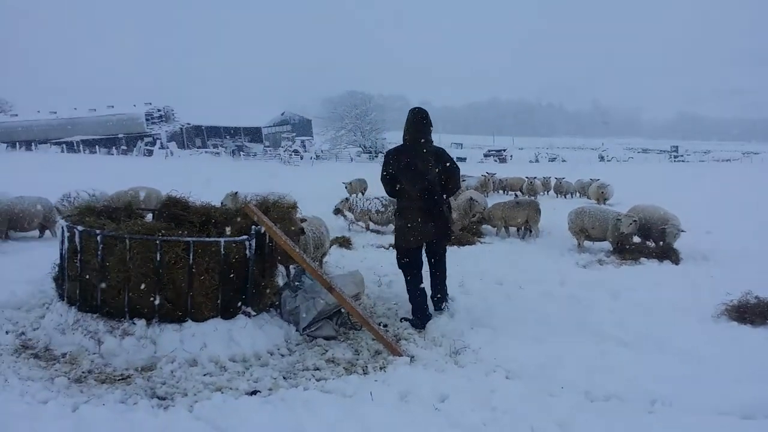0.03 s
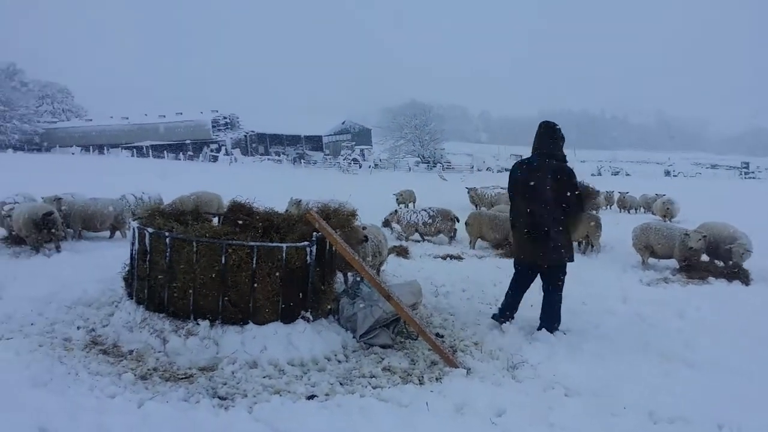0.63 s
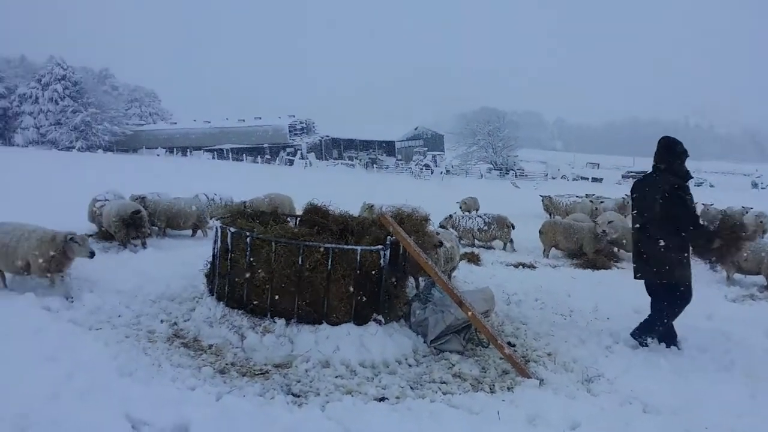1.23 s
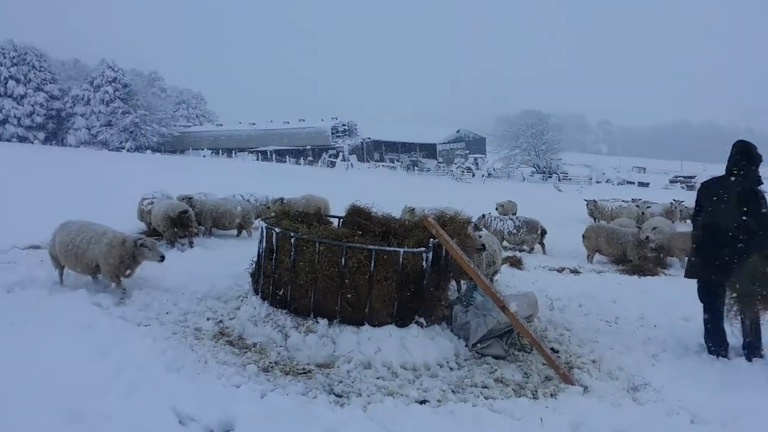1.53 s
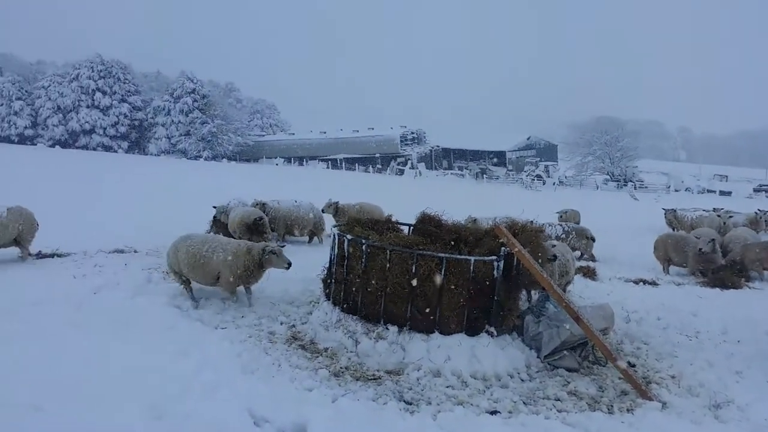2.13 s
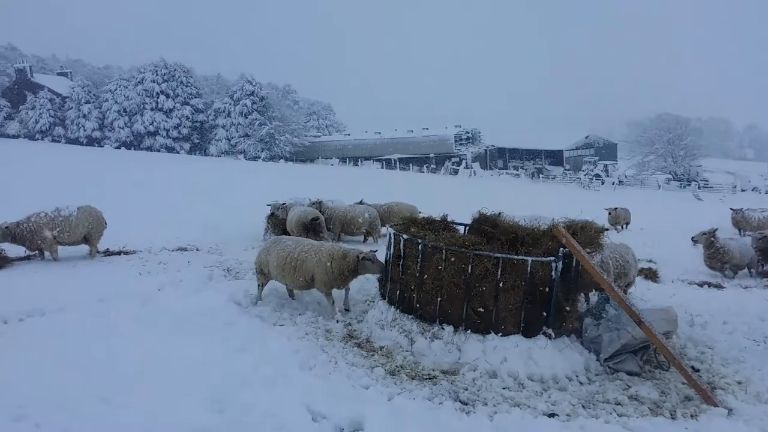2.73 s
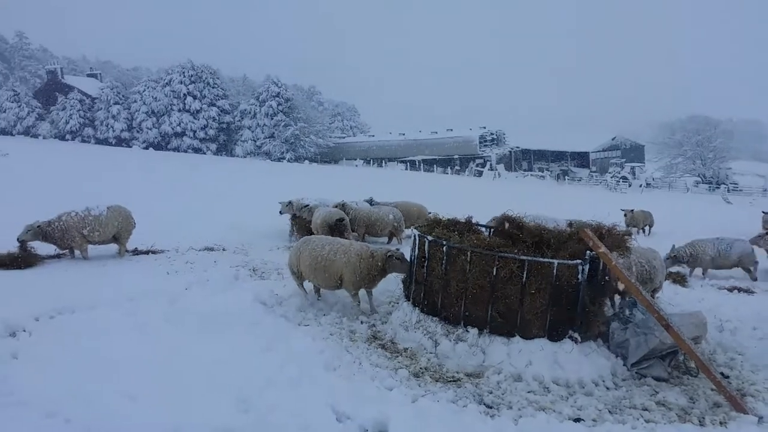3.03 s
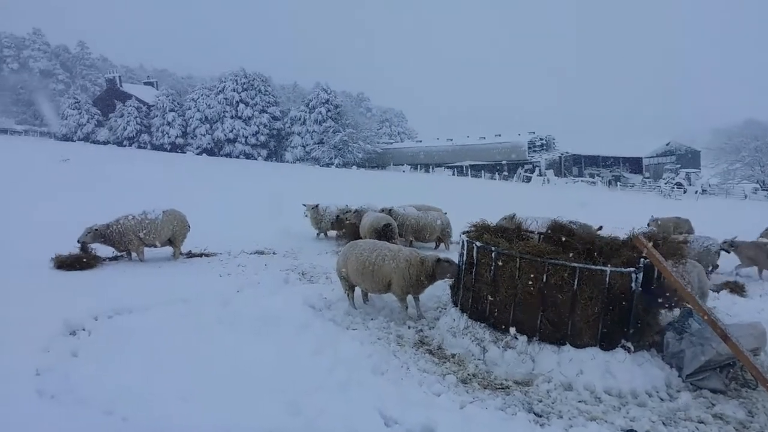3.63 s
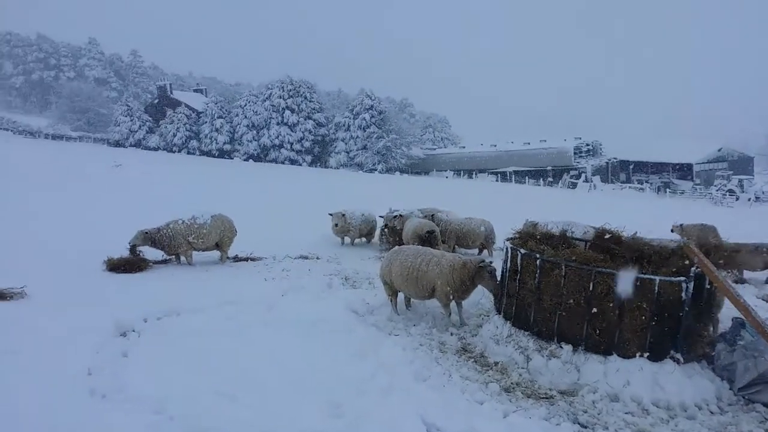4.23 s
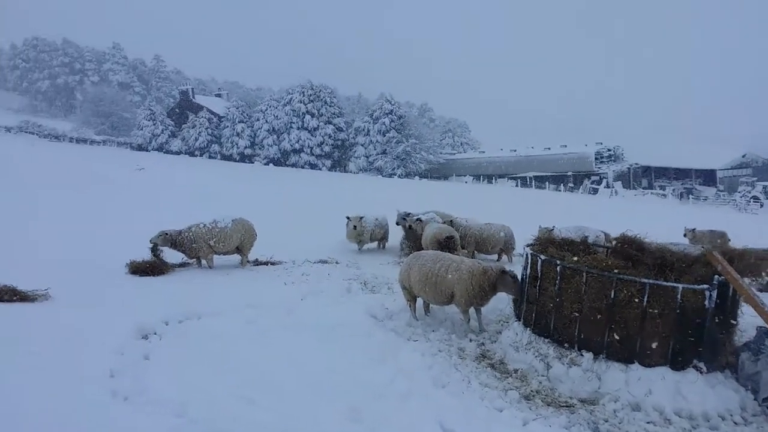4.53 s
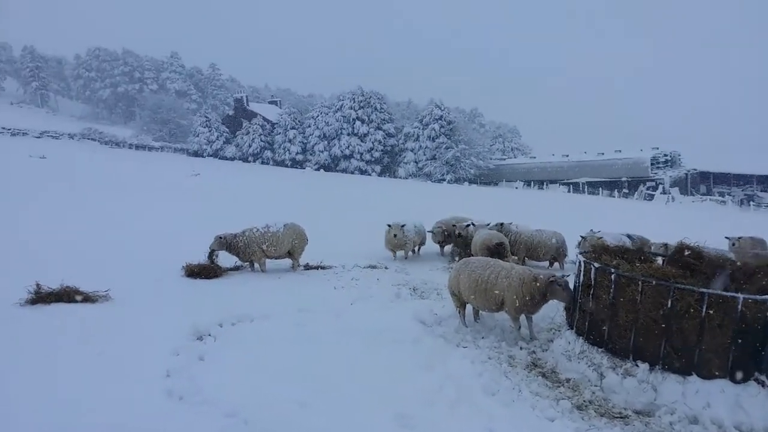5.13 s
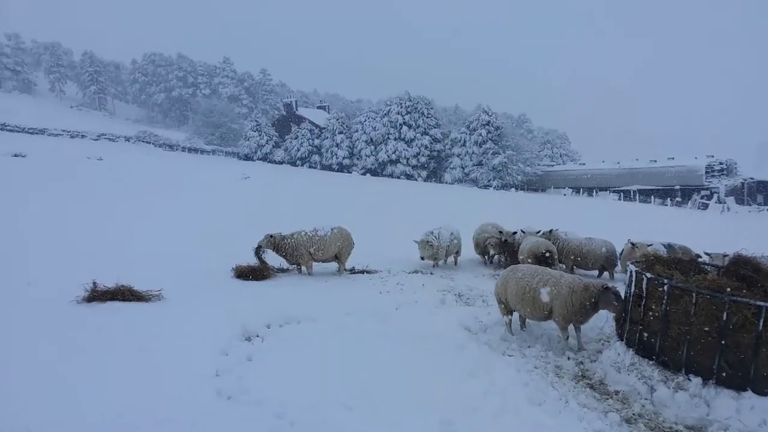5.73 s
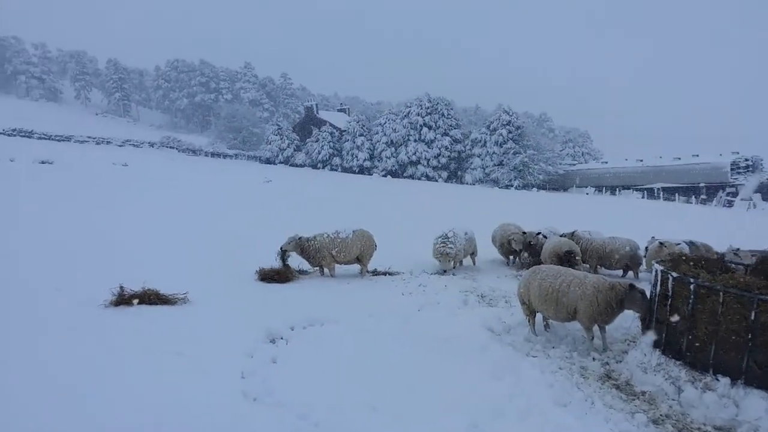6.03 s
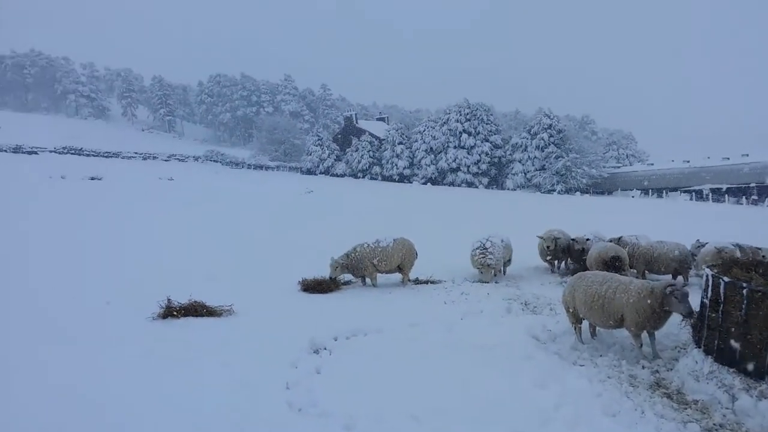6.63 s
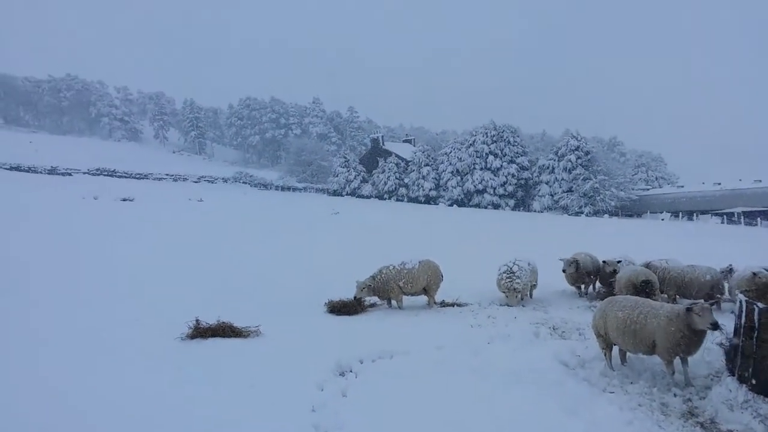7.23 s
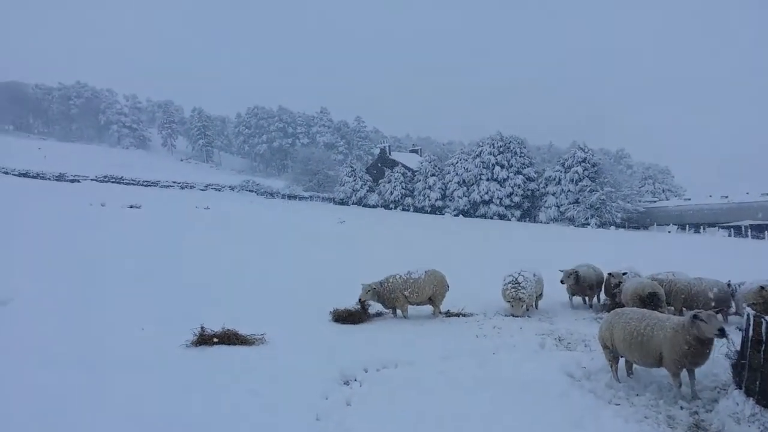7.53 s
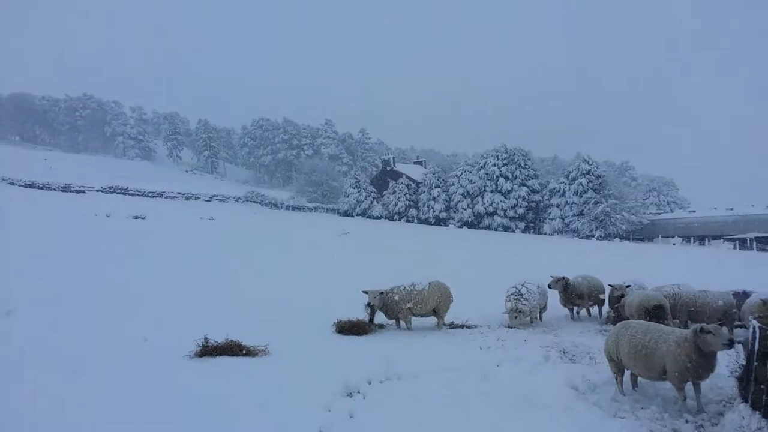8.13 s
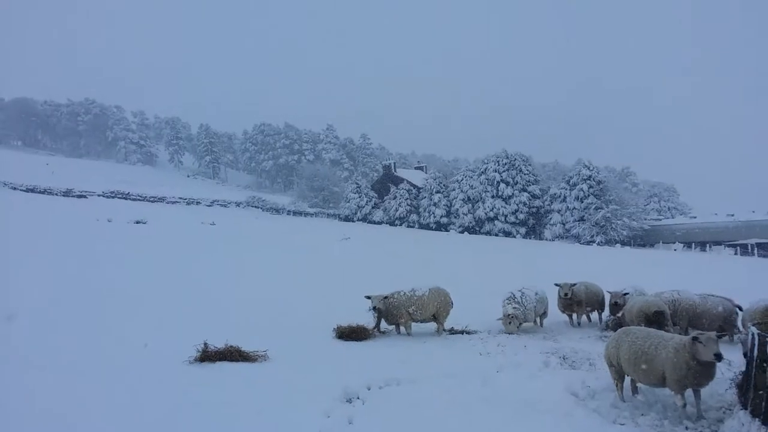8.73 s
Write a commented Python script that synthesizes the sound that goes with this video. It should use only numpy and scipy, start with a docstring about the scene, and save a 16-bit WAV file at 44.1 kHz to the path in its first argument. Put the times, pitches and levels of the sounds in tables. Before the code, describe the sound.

Uneven low wind rumble and thumps on the microphone, over a soft hiss of blowing snow and light flake ticks.

```python
"""Gusty wind buffets the two microphone ports of a hand-held camera in a snowy field.
From the start, eddies rumble on each port separately, louder and brighter in stronger gusts, over far
wind, snow hiss, a faint whistle, fine patter and one faint chirp. Within the first second, tight
vortices begin to slap the ports, soft rustles come in and icy flakes tick on the camera body.
The sound is quieter around 5 s, then the gusts return; from about 6 s the blowing snow grows louder."""
import sys
import numpy as np
from scipy import signal
from scipy.fft import rfft, irfft, next_fast_len
from scipy.io import wavfile
from scipy.ndimage import uniform_filter1d, minimum_filter1d, map_coordinates

SR = 44100
rng = np.random.default_rng(int(sys.argv[2]) if len(sys.argv) > 2 else 0)


def materialize(psi):
    """Save the field psi as 16-bit PCM at rate SR to the path in sys.argv[1].

    A 1-D psi becomes a single channel; in a 2-D psi each row is a channel.
    """
    bounded = np.clip(np.atleast_2d(psi).T, -1, 1)
    quanta = np.round(bounded * 32767).astype(np.int16)
    wavfile.write(sys.argv[1], SR, quanta)


N = 391166
TIME = np.arange(N) / SR
# Loudness of the background hiss, which ducks briefly near 1.1 s and 5.2 s.
# Each row: time in seconds, relative level in dB.
HISS_LEVEL = [(0, -60), (0.8, -57.5), (1.14, -60), (1.9, -59.5), (2.35, -57), (2.65, -60), (2.95, -58),
              (3.38, -59.5), (3.55, -57.5), (3.75, -61), (4.0, -58.5), (4.2, -61.5), (5.08, -60),
              (5.22, -65), (5.45, -61), (6.3, -58), (6.6, -56), (7.28, -53), (7.47, -56), (7.8, -51.5),
              (8.02, -51.5), (8.22, -45), (8.41, -51.5), (8.87, -48.5)]


def undb(db):
    """Decibels to gain."""
    return 10 ** (np.asarray(db) / 20)


def curve(rows):
    """Join (seconds, value) rows with straight lines."""
    return np.interp(TIME, *np.transpose(rows))


def unit(x):
    """Scale to rms 1."""
    return x / np.sqrt(np.mean(x ** 2))


def pan(db):
    """Stereo gains for a left-minus-right level."""
    return undb(np.array([[db], [-db]]) / 2)


def colour(x, points):
    """Filter by a spectrum of (Hz, dB) points; rms 1."""
    hz, db = np.transpose(points)
    size = next_fast_len(x.shape[-1])
    bins_hz = np.maximum(np.fft.rfftfreq(size, 1 / SR), 1)
    gain = undb(np.interp(np.log(bins_hz), np.log(hz), db))
    return unit(irfft(rfft(x, size) * gain, size)[..., :x.shape[-1]])


def resonate(x, hz, width_hz):
    """One resonance, gain 1 at its centre."""
    return signal.lfilter(*signal.iirpeak(min(hz, SR / 2 - 1000), hz / width_hz, fs=SR), x)


def walk(rate_hz):
    """Smooth random motion, rms 1."""
    k = max(int(SR / rate_hz), 2)
    steps = np.repeat(rng.standard_normal(N // k + 1), k)
    return unit(uniform_filter1d(uniform_filter1d(steps, k), k)[:N])


def add(out, start_s, sound):
    """Mix in a short stereo sound."""
    i = max(int(start_s * SR), 0)
    out[:, i:i + sound.shape[1]] += sound[:, :N - i]


def port_band(x, low_hz=72, high_hz=1750):
    """A port passes little of the slowest pressure swings and the finest eddies."""
    x = signal.sosfilt(signal.butter(6, high_hz, fs=SR, output="sos"), x)
    return signal.sosfilt(signal.butter(2, low_hz, "high", fs=SR, output="sos"), x)


def airflow(side, wind_octaves=-.2, surge_hz=26, attack_s=.028, release_s=.04444, sag_db_per_s=2):
    """Wind plus buffets on one port (side > 0: left). Returns level in dB, pitch shift in octaves."""
    # Wind between buffets. Each row: time in seconds, level in dB.
    wind = [(0, -34), (0.85, -25), (1.23, -35), (1.75, -25.5), (2.43, -21.5), (2.62, -41.5), (2.75, -29),
            (3.2, -35), (3.93, -27), (4.17, -38.5), (4.54, -33), (4.82, -53), (5.05, -30), (5.22, -57),
            (5.32, -37), (5.88, -44), (6.26, -42), (6.31, -26), (7.05, -25), (7.12, -53.5), (7.47, -50),
            (7.62, -31.5), (8.87, -22.5)]
    # Shelter of the left port as the camera turns. Each row: time in seconds, left minus right in dB.
    lee = [(0, 4), (1.0, -5), (4.1, -5), (4.6, 2), (5.5, -5), (7.4, -1), (7.7, -12), (8.87, -9.5)]
    # Each row: start in seconds, length in seconds, level in dB, left minus right in dB,
    # pitch shift in octaves.
    buffets = [(0.104, 0.07, -20, -13.5, -0.52), (0.512, 0.13, -22, -8, -0.22),
               (0.718, 0.18, -15, -12, 0.023), (0.91, 0.41, -11.5, -30, -0.0081),
               (1.016, 0.071, -12, 16, -0.31), (1.332, 0.14, -18.5, -11, -0.12),
               (1.522, 0.043, -14, -15, -0.088), (1.619, 0.075, -16, -15, 0.019),
               (1.75, 0.14, -16, 7, -0.086), (1.966, 0.082, -15.5, -21.5, 0.12),
               (2.229, 0.18, -18.5, -2, 0.13), (2.461, 0.11, -20, -20.5, -0.3),
               (2.729, 0.18, -20, -4, -0.46), (2.939, 0.076, -16, -16.5, -0.44),
               (3.122, 0.056, -20, -2, -0.97), (3.249, 0.057, -17.5, -29.5, -0.69),
               (3.409, 0.049, -17, -16.5, -0.85), (3.58, 0.23, -19.5, -2, -0.4),
               (3.822, 0.07, -16, -22, -0.23), (4.306, 0.053, -19, -15, -0.11),
               (4.409, 0.063, -25, -21.5, -0.54), (4.879, 0.13, -27.5, 22, -0.33),
               (5.608, 0.17, -25, -22.5, -0.69), (5.949, 0.1, -26, -20, -0.38),
               (6.158, 0.0548, -25, -20, -0.34), (6.589, 0.32, -17, -5, -0.58),
               (6.977, 0.083, -18.5, 14.5, -0.54), (7.476, 0.093, -27.5, 23, -0.37),
               (7.636, 0.084, -23, -27.5, -0.28), (7.979, 0.2, -20.5, -20, -0.12),
               (8.13, 0.15, -22.5, 1, -0.21), (8.291, 0.16, -25, -5.5, -0.096),
               (8.485, 0.1, -17, -30, 0.095), (8.608, 0.11, -15, -25.5, 0.21),
               (8.742, 0.057, -15, -20.5, 0.12), (8.836, 0.031, -10.5, -27, 0.25)]
    wind_surge_db = 2.5 * np.clip(walk(surge_hz), -2, 2)
    buffet_surge_db = 1.14 * np.clip(walk(surge_hz), -2, 2)
    power = undb(curve(wind) + curve(lee) * (side > 0) + wind_surge_db) ** 2
    weighted_octaves = wind_octaves * power
    for start_s, length_s, db, pan_db, octaves in buffets:
        span = slice(max(int(start_s * SR), 0), int((start_s + length_s + release_s) * SR))
        age_s = TIME[span] - start_s
        envelope = np.clip(age_s / attack_s, 0, 1) * np.clip((length_s - age_s) / release_s + .5, 0, 1)
        push_db = db + min(side * pan_db, 0) - sag_db_per_s * age_s + buffet_surge_db[span]
        push = (envelope * undb(push_db)) ** 2
        power[span] += push
        weighted_octaves[span] += octaves * push
    return 10 * np.log10(power), weighted_octaves / power


def rumble(gust_db, octaves, moderate_db, speed_exponent, swirl_db=2, settle_s=.052):
    """A frozen eddy pattern sweeps over one port; faster air is louder and higher."""
    # Eddy spectrum in a moderate gust. Each row: frequency in Hz, relative density in dB.
    eddies = [(20, -5), (50, -4.5), (100, -1.5), (160, -3), (250, -8.5), (400, -21), (600, -35),
              (850, -45.5), (1200, -67.5), (1800, -95)]
    # Quick swirls and slower puffs raise speed and pressure together.
    swirl = np.clip(walk(rate_hz=190), -2, 2)
    puff_db = 2.8 * np.clip(walk(rate_hz=80), -2, 2)
    gust_speed = undb(speed_exponent * (gust_db - moderate_db))
    speed = gust_speed * 2 ** (octaves + .02002 * puff_db) * np.exp(.18 * swirl)
    pattern = colour(rng.standard_normal(2 * N), eddies)
    pressure = map_coordinates(pattern, [np.cumsum(speed)], order=3, mode="wrap")
    pressure = port_band(pressure * undb(swirl_db * swirl + puff_db))
    # The gust sets the mean level; single eddies stay uneven.
    k = int(settle_s * SR)
    power = uniform_filter1d(uniform_filter1d(pressure ** 2, k), k)
    return pressure / np.sqrt(power + 1e-12) * undb(gust_db)


def far_wind(level_db=-55, flutter_db=2.5):
    """Wind over the field flutters, and ducks briefly with the hiss near 5.2 s."""
    # Each row: frequency in Hz, relative density in dB.
    spectrum = [(30, 4.5), (100, 8.5), (200, -0.5), (350, -2), (550, -8.5), (800, -6.5), (1200, -11.5),
                (1900, -14.5), (4000, -21), (12000, -24)]
    hiss_db = curve(HISS_LEVEL)
    swell_db = np.minimum(hiss_db - hiss_db[0], 1) + .6 * walk(4)
    air = colour(rng.standard_normal((2, N)), spectrum)
    return air * undb(level_db + swell_db + flutter_db * walk(45)) * pan(-4)


def snow_hiss(gain_db=-1.5, flicker_db=.7, lag_samples=12):
    """Blowing snow hisses all around and rings the ports, mainly the left."""
    # Each row: frequency in Hz, relative density in dB.
    spectrum = [(900, -37), (1800, -4.5), (3200, -1.5), (4300, -1), (5200, 0), (6800, 1.5), (8600, -3),
                (10500, -3), (12500, -5.5), (15500, -2)]
    near = rng.standard_normal(N)
    direct = np.array([np.roll(near, lag_samples), near])  # reaches the right port first
    air = rng.standard_normal((2, N)) + direct
    hiss = colour(air * undb(flicker_db * walk(220)), spectrum)
    port_ring = np.array([[1], [.1]]) * resonate(hiss, hz=6750, width_hz=1300)
    return unit(hiss + port_ring) * undb(curve(HISS_LEVEL) + gain_db) * pan(2)


def whistle(start_hz=7165, sag_hz_per_s=41.5, level_db=-75, flutter_db=3):
    """A faint tone high in the hiss wavers and slowly sinks."""
    waver_hz = 20 * walk(120)
    phase = 2 * np.pi * np.cumsum(start_hz - sag_hz_per_s * TIME + waver_hz) / SR
    return unit(np.sin(phase) * undb(flutter_db * walk(30))) * undb(level_db) * pan(5)


def chirp(start_hz=1870, fall_hz_per_s=11000, attack_s=.004, decay_s=.029, level_db=-52):
    """A faint, short tone falls as it fades."""
    out, t = np.zeros((2, N)), np.arange(SR // 12) / SR
    tone = np.sin(2 * np.pi * np.cumsum(start_hz - fall_hz_per_s * t) / SR)
    envelope = np.minimum(t / attack_s, 1) * np.exp(-t / decay_s)
    add(out, 0, tone * envelope * undb(level_db) * pan(0))
    return out


def patter(rate_per_s=75, level_db=-54.5, decay_s=.0037, low_hz=1300, high_hz=8000):
    """Small flakes crunch at random pitch, size and side; their level follows the hiss."""
    out, t = np.zeros((2, N)), np.arange(SR // 60) / SR
    hiss_db = curve(HISS_LEVEL)
    for when, size, pitch, side in rng.random((int(rate_per_s * N / SR), 4)):
        hz = low_hz * (high_hz / low_hz) ** pitch
        crunch = resonate(rng.standard_normal((2, len(t))) * np.exp(-t / decay_s), hz, .59 * hz)
        size_db = 3.2 * min(-np.log(size), 3.5)
        db = level_db + size_db + .8 * (hiss_db[int(when * N)] - hiss_db[0])
        add(out, when * N / SR, crunch * undb(db) * pan(10 * side - 5))
    return out


def slaps(gain_db=-3, thud_db=-9, wake_db=-14, wake_s=.0037, roll_db=-13, roll_s=.011, far_port_db=-33):
    """A tight vortex crosses a port: core push-pull, slower rim thud, fine wake, deeper roll."""
    # Each row: time in seconds, relative level in dB, core pitch in Hz, port ("left" or "right").
    vortices = [(0.139, -8, 188, "right"), (0.161, -10, 228, "right"), (0.526, -6.5, 240, "right"),
                (0.553, -10, 295, "right"), (0.613, -7.5, 183, "right"), (0.918, -3.5, 312, "right"),
                (0.932, -4.5, 378, "right"), (0.958, -5, 336, "right"), (0.965, -9.5, 895, "right"),
                (0.984, 2, 325, "right"), (0.998, 2, 230, "right"), (1.013, -3, 302, "right"),
                (1.026, -1, 202, "right"), (1.060, 2, 125.8, "left"), (1.064, -6.5, 404, "right"),
                (1.112, -3, 286, "right"), (1.129, -1, 395, "right"), (1.148, 0, 356, "right"),
                (1.175, -3, 292, "right"), (1.205, -2.5, 367, "right"), (1.244, -2, 214.3, "right"),
                (1.254, -13.5, 619, "right"), (1.302, -1.5, 303, "right"), (1.329, -7, 362, "right"),
                (1.355, -9.5, 256.6, "right"), (1.393, -5, 230.2, "right"), (1.451, -6, 268.7, "right"),
                (1.557, -9, 243, "right"), (1.656, -7, 253, "right"), (1.815, -14.5, 280, "right"),
                (1.852, -6.5, 272.6, "left"), (1.994, -4, 302, "right"), (2.022, -6.5, 419, "right"),
                (2.038, -6.5, 232, "right"), (2.085, -9.5, 329.4, "right"), (2.164, -8, 226, "right"),
                (2.198, -2.5, 215.2, "left"), (2.239, -5.5, 278.4, "left"), (2.257, -4.5, 230.3, "right"),
                (2.278, -7, 240, "right"), (2.302, -12.5, 319.8, "right"), (2.337, -4.5, 309.8, "right"),
                (2.368, -8, 248.1, "right"), (2.455, -8, 255.8, "left"), (2.490, -9, 261, "right"),
                (2.553, -6.5, 161.2, "right"), (2.778, -11, 216.2, "right"), (2.877, -9.5, 491, "left"),
                (2.980, -12.5, 170, "right"), (3.436, -11, 114.8, "right"), (3.624, -9.5, 191, "right"),
                (3.756, -6.5, 190.5, "right"), (3.766, -5, 242, "right"), (3.846, -7.5, 260.4, "right"),
                (3.859, -2.5, 248.3, "right"), (3.875, -6.5, 346.5, "right"), (3.918, -7, 187.6, "right"),
                (4.337, -11.5, 299, "right"), (4.450, -16.5, 186, "right"), (4.968, -18.5, 200, "left"),
                (5.323, -20, 200, "left"), (5.644, -8.5, 134.3, "right"), (5.726, -16, 160, "right"),
                (6.359, -14, 210, "right"), (6.638, -6, 130, "left"), (6.749, -9, 245.3, "left"),
                (6.79, 0, 142.4, "left"), (6.834, -8, 207.2, "right"), (6.896, -11.5, 240.7, "right"),
                (7.019, -10, 199.2, "left"), (7.046, -11, 181.7, "left"), (8.005, -12.5, 204.3, "right"),
                (8.056, -20.5, 290, "right"), (8.144, -14, 309.4, "left"), (8.242, -7.5, 274.6, "left"),
                (8.300, -15, 199.8, "right"), (8.347, -21.5, 359, "left"), (8.413, -16.5, 290.7, "left"),
                (8.494, -10.5, 260.4, "right"), (8.505, -3.5, 316, "right"), (8.526, -6, 490, "right"),
                (8.513, -9.5, 421, "right"), (8.544, -7, 338.3, "right"), (8.576, -7.5, 339, "right"),
                (8.629, -5, 592.3, "right"), (8.648, -6, 199.9, "right"), (8.670, -11.5, 381.1, "right"),
                (8.684, -13, 420, "right"), (8.697, -9.5, 310.2, "right"), (8.718, -7.5, 139.6, "right"),
                (8.761, -8, 490, "right"), (8.768, -8.5, 470.8, "right"), (8.819, -13, 255.9, "right"),
                (8.848, -11, 250.5, "right"), (8.862, -3.5, 320, "right")]
    out, t = np.zeros((2, N)), np.arange(-SR // 100, SR // 20) / SR
    wake_age = np.maximum(t / wake_s + .5, 0)  # starts just ahead of the core
    wake_envelope = (wake_age * np.exp(1 - wake_age)) ** 1.8
    roll_envelope = np.exp(-(t / roll_s - .5) ** 2) * np.clip(1 - t / t[0], 0, 1)
    push_pull = lambda phase: -phase * np.exp((1 - phase ** 2) / 2)
    for time_s, db, hz, port in vortices:
        port_gains = undb([[0], [far_port_db]] if port == "left" else [[far_port_db], [0]])
        phase = 2 * np.pi * hz * t
        swing = push_pull(phase) + undb(thud_db) * push_pull(.48 * phase)
        swing = np.real(signal.hilbert(swing) * np.exp(2j * np.pi * rng.random()))  # any crossing angle
        low_noise = resonate(resonate(rng.standard_normal(len(t)), hz / 2, hz / 2), hz / 2, hz / 2)
        roll = unit(low_noise) * roll_envelope
        wake_band = signal.butter(4, [hz / 2, hz * 1.88], "band", fs=SR, output="sos")
        wake = unit(signal.sosfilt(wake_band, rng.standard_normal(len(t)))) * wake_envelope
        slap = port_band(swing + undb(wake_db) * wake + undb(roll_db) * roll)
        add(out, time_s + t[0], slap * undb(db + gain_db) * port_gains)
    return out


def rustles(grain_db=4, grain_hz=450):
    """Short, gritty swells of friction, as of a coat or packed snow."""
    # Each row: peak time in seconds, level in dB, 1/e half-length in seconds, centre in Hz, width in Hz.
    scuffs = [(0.33, -55, 0.015, 990, 800), (2.107, -57, 0.052, 5570, 5500),
              (2.27, -58.5, 0.066, 4174, 5000), (2.467, -64, 0.04, 2980, 3000),
              (5.116, -53, 0.0059, 849.3, 190), (5.456, -62, 0.038, 1088, 397.6),
              (5.94, -59, 0.062, 850.2, 699.7), (5.953, -58, 0.061, 4400, 3202),
              (6.587, -50.5, 0.0094, 1143, 249.7), (8.438, -38, 0.0052, 700.7, 700.4),
              (8.457, -46, 0.015, 1098, 800)]
    out = np.zeros((2, N))
    grain = undb(grain_db * np.clip(walk(grain_hz), -2, 2))
    for peak_s, db, half_s, hz, width_hz in scuffs:
        rub = resonate(resonate(rng.standard_normal((2, N)) * grain, hz, width_hz), hz, 2 * width_hz)
        out += unit(rub) * undb(db) * np.exp(-((TIME - peak_s) / half_s) ** 2)
    return out


def flake_ticks(gain_db=.5, crush_s=.0011, splash_db=-21):
    """Each large icy flake shatters on the camera body and rings the spot it hits."""
    # Each row: start in seconds, relative peak level in dB, ring in Hz, left minus right in dB.
    flakes = [(0.582, -45, 6500, -4), (0.795, -45, 7500, 0), (0.807, -44, 6987, 6), (0.909, -39.5, 4920, 5),
              (1.737, -32, 6300, 6), (2.361, -47, 6000, 0), (2.373, -36.5, 6685, 4), (2.428, -46, 4800, 0),
              (2.535, -43, 6990, 0), (2.675, -47, 5794, 4), (2.832, -39.5, 6196, 4), (2.845, -40, 2588, -2),
              (3.056, -38, 6206, 3), (3.544, -43, 6008, 0), (4.619, -49, 12230, -5),
              (4.8179, -32.5, 6243, 15), (4.856, -50, 8996, 0), (4.880, -43, 3314, -3),
              (4.9094, -43, 7160, -11), (5.0271, -40, 5710, 10), (5.199, -44, 3988, -4),
              (5.236, -51, 2970, 3), (5.303, -44, 7020, 3), (5.365, -51, 9530, 0), (5.583, -48, 5003, -5),
              (5.674, -41, 3010, 2), (5.725, -41.5, 3183, -11), (6.0647, -38.5, 5613, 5),
              (6.35, -40.5, 4002, -5), (6.542, -44, 6001, -4), (7.473, -43, 9005, 0), (7.645, -37, 2900, 3),
              (7.698, -41, 6030, 0), (7.735, -39, 6626, 6), (7.877, -38.5, 3503, -7), (8.033, -38, 2703, 2),
              (8.436, -34, 3114, -11), (8.515, -39, 5487, 0), (8.584, -35, 6800, 9)]
    out, t = np.zeros((2, N)), np.arange(SR // 30) / SR
    for start_s, db, hz, pan_db in flakes:
        crush = rng.standard_normal((2, len(t))) * t * np.exp(-(t / crush_s) ** 1.5)
        tick = resonate(crush, hz, width_hz=750) + undb(splash_db) * crush
        tick = signal.sosfilt(signal.butter(4, hz * .61, "high", fs=SR, output="sos"), tick)
        tick /= np.abs(tick).max(axis=1, keepdims=True)
        add(out, start_s, tick * undb(db + gain_db) * pan(pan_db))
    return out


def scene():
    """Separate buffeting on each port, over the snow and the quiet field."""
    left = rumble(*airflow(side=.99), moderate_db=-23, speed_exponent=.19)
    right = rumble(*airflow(side=-1), moderate_db=-21.5, speed_exponent=.23)
    buffeting = np.array([left, right]) + slaps()
    return buffeting + snow_hiss() + flake_ticks() + patter() + rustles() + far_wind() + whistle() + chirp()


def record(dry):
    """A limiter eases each channel down around the hardest peaks; a steep low-pass follows."""
    ceiling, cutoff_hz, k = .9, 15750, SR // 100
    gain = minimum_filter1d(ceiling / np.maximum(np.abs(dry), ceiling), 2 * k)
    gain = uniform_filter1d(uniform_filter1d(gain, k), k)
    return signal.sosfilt(signal.ellip(10, .2, 80, cutoff_hz, fs=SR, output="sos"), dry * gain)


dry = scene()
out = record(dry)
materialize(out)
```